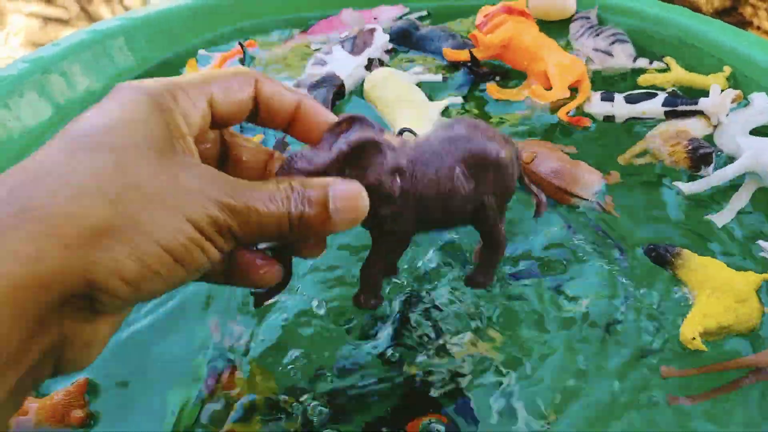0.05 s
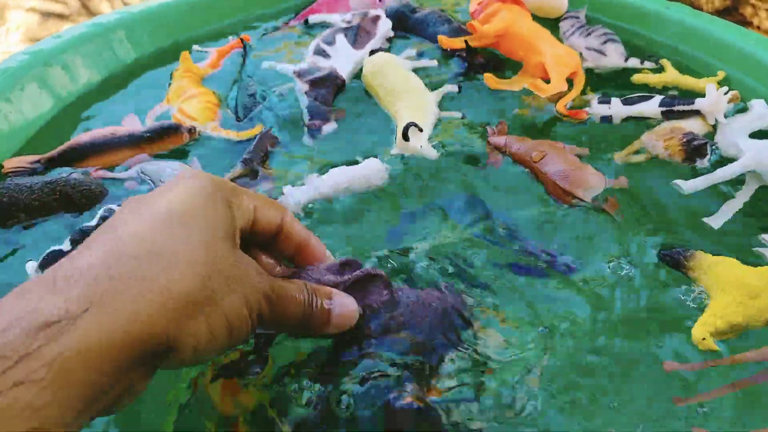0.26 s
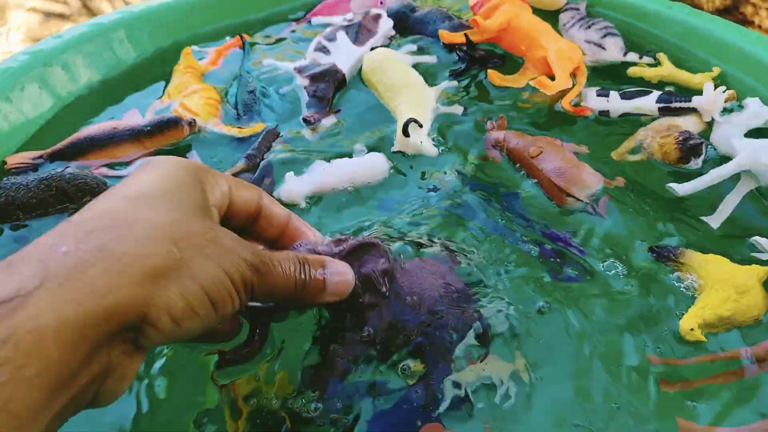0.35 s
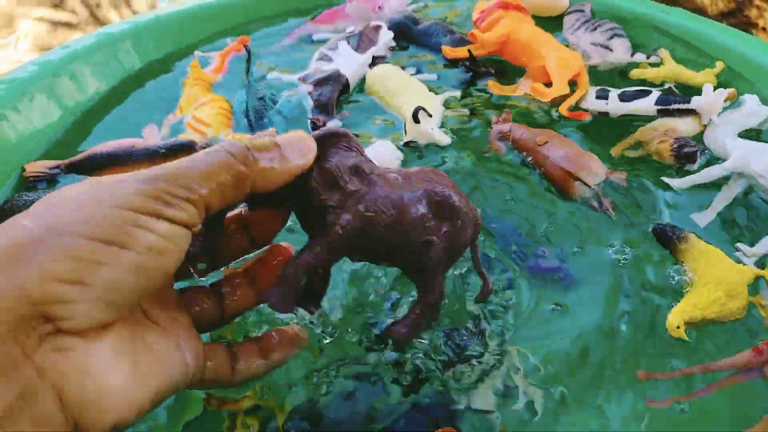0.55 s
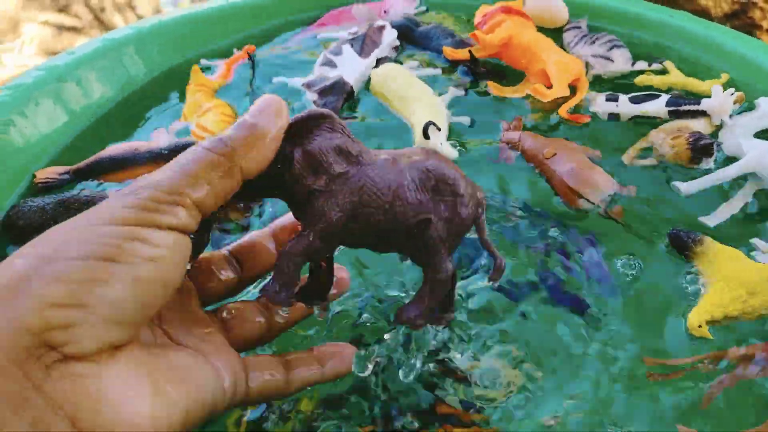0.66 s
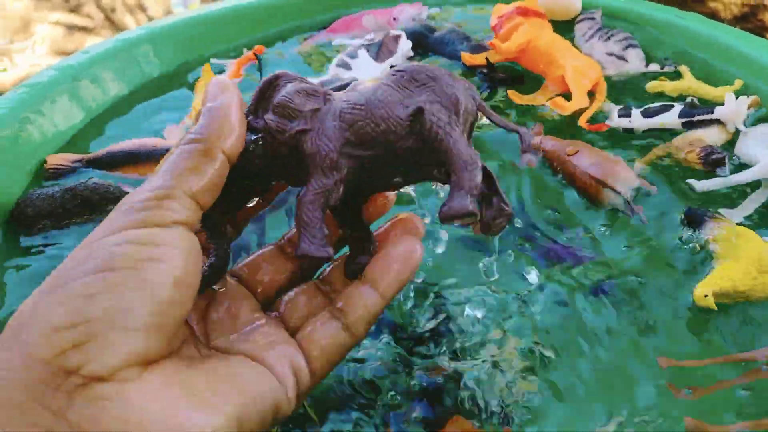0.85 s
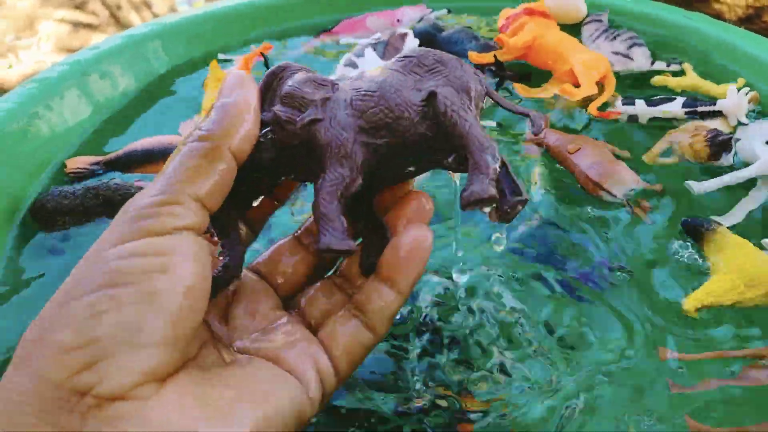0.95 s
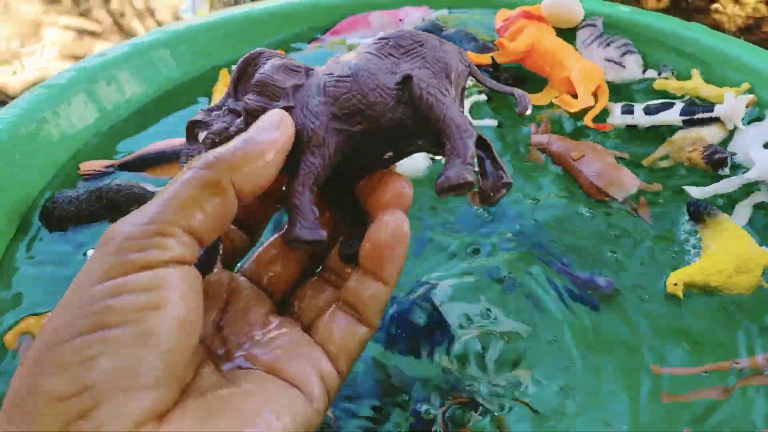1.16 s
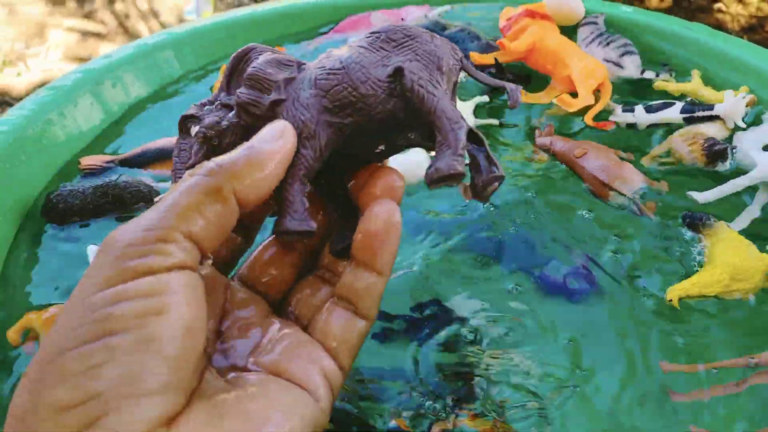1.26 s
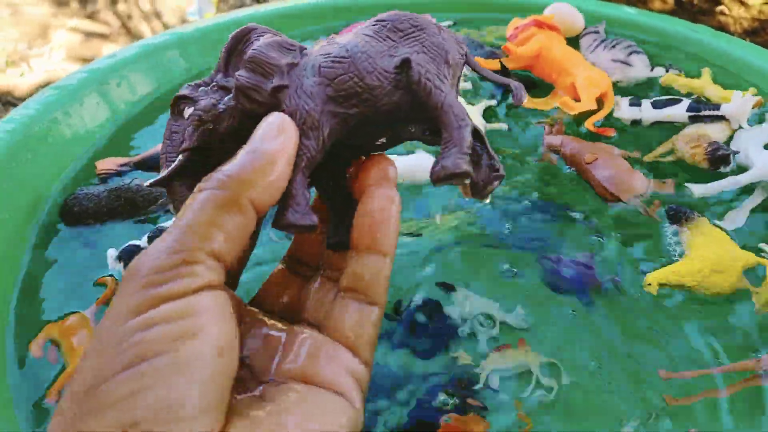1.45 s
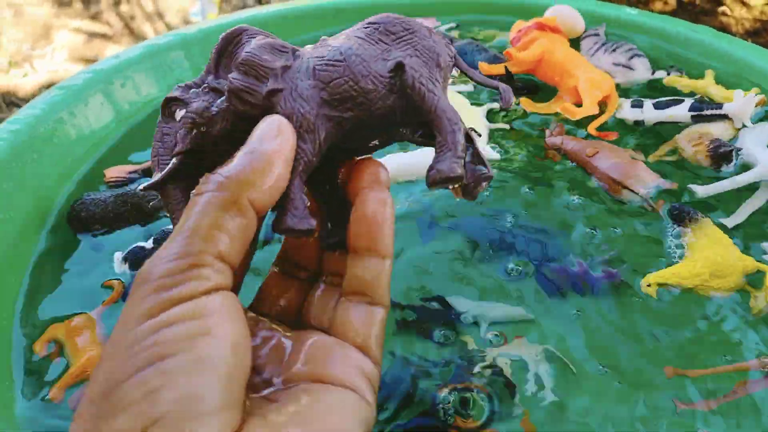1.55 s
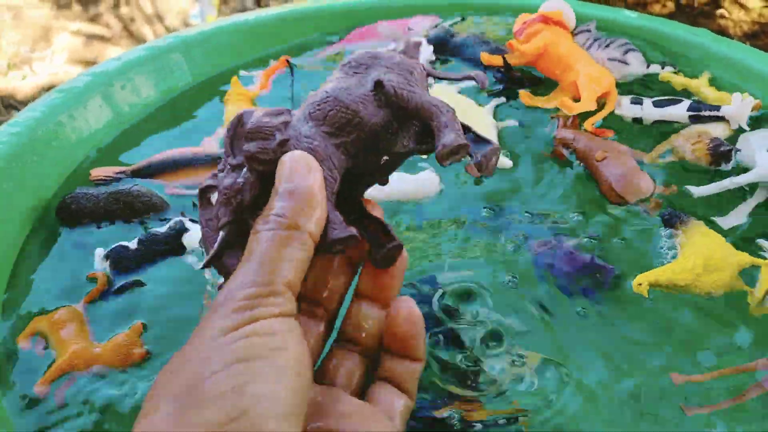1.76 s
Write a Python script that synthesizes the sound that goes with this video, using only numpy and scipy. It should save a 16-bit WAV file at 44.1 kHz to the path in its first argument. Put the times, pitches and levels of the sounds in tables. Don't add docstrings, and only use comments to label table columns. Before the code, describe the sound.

A water splash as a hand plunges a small plastic toy into a tub, then scattered drips

```python
import sys
import numpy as np
from scipy import signal
from scipy.fft import rfft, irfft, next_fast_len
from scipy.io import wavfile
from scipy.ndimage import map_coordinates

SR = 44100
rng = np.random.default_rng(int(sys.argv[2]) if len(sys.argv) > 2 else 0)


def invert_db(x):
    u = np.asarray(x, float) / 20
    return 10 ** u


def wrap_up_sound(samples):
    columns = np.atleast_2d(samples).T
    tamed = np.clip(columns, -1, 1)
    steps = np.round(tamed * 32767).astype(np.int16)
    wavfile.write(sys.argv[1], SR, steps)


N = 79380


def unit(x):
    return x / np.sqrt(np.mean(x ** 2) + 1e-20)


def colour(x, points):
    m = 2 * next_fast_len(N // 2 + 4096)
    freq_hz, gain_db = np.transpose(points)
    log_hz = np.log(np.fft.rfftfreq(m, 1 / SR) + 1)
    cepstrum = irfft(np.log(invert_db(np.interp(log_hz, np.log(freq_hz), gain_db))), m)
    cepstrum[1:m // 2] *= 2
    cepstrum[m // 2 + 1:] = 0
    return irfft(rfft(x, m) * np.exp(rfft(cepstrum)), m)[:N]


def place(start_s, shapes):
    i = np.round(np.asarray(start_s) * SR).astype(int)[:, None] + np.arange(shapes.shape[1])
    return np.bincount(i.ravel(), shapes.ravel(), N + SR)[:N]


def bubbles(start_s, level_db, pitch_hz, life_s, rise, attack_s, size,
            bend=1, fade_db=60, rough=0, swing_db=0):
    t = np.arange(size) / SR
    columns = (level_db, pitch_hz, life_s, rise)
    db, hz, life, rise = [np.broadcast_to(v, np.shape(start_s))[:, None] for v in columns]
    age = t / np.abs(life)
    phase = 2 * np.pi * hz * t * (1 + rise * np.minimum(age, 1.2) ** bend / (bend + 1))
    env = invert_db(db - fade_db * age + swing_db * np.exp(-t * hz / 2))
    env = env * (1 - np.exp(-(t / attack_s) ** 2))
    env = env * np.clip(10 * (1.1 - age), 0, 1)
    noise = rng.standard_normal((len(start_s), 2, size))
    waver = unit(signal.fftconvolve(noise, np.blackman(60)[None, None], 'same', axes=2))
    a, b = waver.transpose(1, 0, 2)
    return place(start_s, env * ((1 + rough * a) * np.sin(phase) + rough * b * np.cos(phase)))


def cracks(start_s, level_db, t60_s, points):
    t = np.arange(600) / SR
    decay = invert_db(np.asarray(level_db)[:, None] - 60 * t / t60_s)
    return colour(place(start_s, rng.standard_normal((len(start_s), len(t))) * decay), points)


def scatter(count, scatter_db, cap_db):
    r = rng.random((count, 2))
    return r[:, 0] * N / SR, np.minimum(-scatter_db * np.log(r[:, 1]), cap_db)


# freq_hz [Hz], density_db [dB per Hz]
YARD = [(30, -17.5), (70, -17.5), (110, -2), (480, -9.5), (800, -10), (2500, -19), (4600, -27), (9000, -47)]
# freq_hz [Hz], gain_db [dB]
FILM = [(3500, -42.5), (4900, -24.5), (5900, -7), (7300, 3), (8300, -6), (9500, -46), (12000, -32)]
# freq_hz [Hz], gain_db [dB]
SPIT = [(7000, -46.5), (9000, -7.5), (10500, -16), (12000, 0.5), (14000, -7), (15300, -1), (16300, -9)]


def yard():
    rumble, far_fizz, hiss = [unit(colour(rng.standard_normal(N), c)) for c in (YARD, FILM, SPIT)]
    t = np.arange(N) / SR
    sway = map_coordinates(rng.standard_normal(40), [np.arange(N) * 15 / SR])
    hum_hz = 98
    hum = invert_db(2.5 * sway) * np.sin(2 * np.pi * hum_hz * t + 0.21 * sway[::-1])
    return invert_db(-77.5) * rumble + invert_db(-83.5) * hum + invert_db(-98) * far_fizz + invert_db(-102) * hiss


# time_s [s], level_db [dB]
STIR = [(0, -55), (.15, -60), (.167, -69), (0.176, -50.5), (0.226, -54), (0.238, -38.5), (.28, -49.5),
        (0.311, -70.5), (0.352, -54.5), (.4, -74.5), (.75, -70.5), (0.928, -70.5), (1.0, -84), (1.15, -71),
        (1.3, -94), (1.55, -81), (1.62, -108), (1.8, -92)]
TUB_HZ = (1420, 2380)
# freq_hz [Hz], gain_db [dB]
CRACK = [(400, -36), (1500, -14), (2500, 0.5), (4600, -12), (5500, -3), (7300, -4.5), (8300, -16.5),
         (9800, -39)]
LIFTED_S = 0.52


def gurgle():
    s, db = scatter(count=600, scatter_db=-2.0, cap_db=2.0)
    g = rng.standard_normal((len(s), 3))
    hz = np.where((g[:, 0] > 0) & (s < LIFTED_S), *TUB_HZ)
    hz = hz * np.exp(0.2 * np.clip(g[:, 1], -1.5, 2))
    life_s = 30 * np.exp(0.45 * np.tanh(g[:, 2])) / hz
    return unit(bubbles(s, db, hz, life_s, 0, 0.00063, size=2400, fade_db=43, rough=0.13))


def stirring():
    t = np.arange(N) / SR
    level_db = np.interp(t, *np.transpose(STIR))
    crackle = unit(cracks(*scatter(count=260, scatter_db=7, cap_db=8), 0.004, FILM))
    wash = unit(cracks(*scatter(count=900, scatter_db=7.0, cap_db=12.5), 0.0068, CRACK))
    spray = unit(cracks(*scatter(count=300, scatter_db=3.0, cap_db=18.5), 0.006, SPIT))
    settle_db_per_s = 1
    crackle_db = -7 - 0.56 * (level_db + 67.5) - settle_db_per_s * t
    gurgle_db = -53 + 1.046 * (level_db + 51.0)
    top = invert_db(crackle_db) * crackle + invert_db(-7) * wash + invert_db(-18) * spray
    return invert_db(level_db) * top + invert_db(gurgle_db) * gurgle()


LATE_S = 0.00044

# start_s [s], level_db [dB peak], pitch_hz [Hz]
GULPS = [(0.004, -39, 2125), (0.023, -70, 1520), (0.059, -37.5, 1555), (0.0255, -43.5, 2170),
         (0.168, -37.5, 2260), (0.189, -31.5, 2870), (0.211, -37.5, 1602), (0.2375, -18, 1600),
         (0.243, -14, 2512), (0.2505, -27.5, 2500), (0.2595, -26.5, 1620), (0.263, -30.5, 900),
         (0.271, -24, 1618), (0.286, -32.5, 1730), (0.294, -35.5, 1420), (0.308, -33.5, 1440),
         (0.347, -41.5, 1690),
         (0.531, -52.5, 2130), (0.579, -44, 2350), (0.632, -54.5, 2250), (0.684, -46.5, 2310),
         (0.704, -47.5, 1485), (0.761, -51, 2240), (0.991, -49, 2360), (1.1125, -34, 2610),
         (1.152, -47.5, 2380), (1.23, -50.5, 2370), (1.253, -55.5, 1670), (1.277, -54.5, 1421),
         (1.326, -55.5, 2836), (.533, -51, 2920), (.826, -60, 2340), (.836, -51.5, 2370),
         (1.153, -56, 1530), (1.253, -56.5, 2710),
         (0.0582, -37.5, 3270),
    (0.2225, -35.5, 2170),
    (.2995, -45, 1420),
    (0.578, -49.5, 1560),
    (0.8551, -44, 1448),
    (0.99, -53, 1480),
    (1.063, -43.5, 2360),
]


def gulps():
    s, db, hz = np.transpose(GULPS)
    s = s + LATE_S
    ring = bubbles(s, db + 1.0, hz, 30 / hz, 0.2, attack_s=0.00055, size=2000, rough=0.4)
    return ring + cracks(s, db - 8.5, 0.019, CRACK)


# start_s [s], level_db [dB peak]
CONTACTS = [(.0055, -62), (.0145, -41), (.0255, -43), (.0435, -65), (.0592, -31), (.1236, -56),
            (.1692, -54.5), (.1845, -36.5), (.2313, -14), (.2372, -25), (.2445, -30), (.2507, -21),
            (.2600, -29), (.2709, -14), (.2880, -36), (.2955, -32.5), (0.8782, -45.5), (.8916, -24),
            (1.0640, -41), (1.0726, -40.5), (1.1106, -28.5), (1.2305, -74), (1.2535, -72), (1.2775, -58),
            (1.3265, -57.5)]
# freq_hz [Hz], gain_db [dB]
CONTACT = [(500, -30), (1400, -2.5), (2500, 11.5), (4600, -9.5), (5800, 1.5), (7300, 0), (8500, -13.5),
           (10000, -33.5)]


def contacts():
    return cracks(*np.transpose(CONTACTS), 0.003, CONTACT)


# start_s [s], level_db [dB peak], pitch_hz [Hz], life_s [s], rise [pitch ratio]
MURK = [(.010, -51, 1409, 0.033, -0.0099), (0.014, -46, 2800, 0.0095, 0.0067),
        (0.061, -74, 1180, 0.043, -0.15), (0.084, -57, 964, 0.047, 0.0086),
        (0.094, -41, 2820, 0.0093, 0.0098), (.183, -37.5, 1457, 0.011, -0.071),
        (.2945, -52, 753, 0.046, 0.053), (0.341, -58.5, 944, 0.08, 0.22),
        (0.377, -46.5, 1060, 0.013, 0.076), (.240, -33.5, 389, 0.027, -0.043),
        (1.211, -58, 2300, 0.01, 0.4)]


def murk():
    return bubbles(*np.transpose(MURK), attack_s=0.006, size=2800, fade_db=12.5, rough=0.17)


# start_s [s], level_db [dB peak], pitch_hz [Hz]
TINY_TICKS = [(0.0169, -37.5, 7330), (0.0693, -27.5, 6350), (0.1695, -39, 6800), (0.184, -35, 6380),
              (0.188, -39.5, 3900), (0.1965, -37, 7600), (0.2306, -23, 7420), (0.2374, -20, 3990),
              (0.2385, -24, 5400), (0.276, -31, 6230), (0.2866, -31, 5900), (0.2947, -38.5, 7600),
              (0.3641, -47, 7160), (0.373, -51.5, 7060), (0.3817, -51, 5030), (0.4645, -48.5, 7000),
              (0.5794, -41, 5900), (0.6334, -42, 6980), (0.6537, -38, 7440), (0.6922, -50, 5340),
         (0.7165, -51, 5000), (0.7335, -49.5, 5150), (0.747, -42, 6230), (0.7599, -44.5, 3570),
         (0.856, -50, 4290), (0.8726, -46.5, 6100), (0.8896, -49, 5100), (0.9573, -55, 5660),
         (1.0303, -44.5, 8390), (1.109, -35, 7030), (1.1312, -43.5, 3770), (1.1505, -44, 7380),
         (1.21, -44.5, 7600),
              (1.267, -53.5, 6820), (1.329, -60.5, 5160), (1.4032, -45.5, 4416), (1.445, -52.5, 3710),
              (1.501, -51.5, 6400), (1.54, -41, 7410), (1.5692, -56, 6970), (1.6651, -35, 6110),
              (1.673, -47.5, 6530), (1.6896, -37, 5750), (1.6931, -37.5, 7710), (1.7864, -54, 6830),
              (.0940, -44, 6950),
    (1.419, -49.5, 5590),
    (1.4435, -47, 6030),
]


def ticks():
    s, db, hz = np.transpose(TINY_TICKS)
    life_s = 0.0097 * 6500 / hz
    return bubbles(s + LATE_S, db + 3.0, hz, life_s, -0.018, attack_s=0.00053, size=900, rough=0.21)


def plunk(rows, bend):
    s, db, hz, life_s, rise = np.transpose(rows)
    ring = bubbles(s, db, hz, life_s, rise, attack_s=0.0018, size=2800, bend=bend,
                   fade_db=24.5, swing_db=17, rough=0.04)
    return ring + cracks(s, db - 4, 0.006, CRACK)


# start_s [s], level_db [dB peak], pitch_hz [Hz], life_s [s], rise [pitch ratio]
POCKETS = [
    (.1230, -50, 1388, 0.043, 0.084),
    (.2308, -15.5, 2415, 0.012, 0.033),
    (.2430, -29, 734, 0.02, 0.076),
    (.2510, -30.5, 910, 0.034, 0.022),
    (.4450, -56, 2390, 0.018, -0.081),
    (.8787, -24.5, 2580, 0.0068, -0.19),
    (1.0727, -30.5, 1420, 0.036, 0.33),
]


def pockets():
    return plunk(POCKETS, bend=1.1)


# start_s [s], level_db [dB peak]
FILMS = [(.2214, -33.5), (.3062, -37.5), (.3349, -44.5), (0.4004, -61), (.4452, -74), (0.4805, -47),
         (.4981, -52), (.5126, -56), (0.534, -60), (0.593, -69), (0.6107, -52), (.6737, -49), (.7110, -40),
         (0.7835, -42), (0.8273, -54), (.9725, -55), (0.994, -42.5), (1.0508, -55.5), (1.0916, -54),
         (1.101, -54), (1.135, -39), (1.175, -64), (1.3043, -61.5), (1.3669, -66.5), (1.3823, -59),
         (1.4031, -44.5), (1.435, -41), (1.4701, -55), (1.488, -69), (1.73, -50), (1.747, -65),
         (1.765, -66)]


def films():
    return cracks(*np.transpose(FILMS), 0.006, FILM)


# start_s [s], level_db [dB peak]
SPITS = [(0.2301, -40), (0.2954, -42.5), (0.633, -54), (0.8779, -57), (1.0301, -61), (1.2064, -52.5),
         (1.297, -69), (1.4032, -55.5), (1.4456, -61.5), (1.6933, -52.5)]


def spits():
    s, db = np.transpose(SPITS)
    return cracks(s + LATE_S, db + 7.0, 0.008, SPIT)


# start_s [s], level_db [dB peak], pitch_hz [Hz]
SLAP = [
    (0.2684, -30.5, 6770),
    (.2704, -9.5, 7250),
    (.2706, -14, 4967),
    (.2712, -18.5, 3950),
    (.2718, -16, 6500),
    (.2720, -16.5, 7300),
    (.2722, -15, 5700),
]


def slap():
    s, db, hz = np.transpose(SLAP)
    return bubbles(s, db + 7.5, hz, 0.0056, 0, attack_s=0.00061, size=500)


# start_s [s], level_db [dB peak], pitch_hz [Hz], life_s [s], rise [pitch ratio]
DRIPS = [
    (.8912, -29, 2220, 0.02, 0.18),
    (1.1105, -26.5, 2425, 0.015, 0.36),
    (1.1318, -42, 2380, 0.016, 0.37),
]


def drips():
    return plunk(DRIPS, bend=3.5)


# start_s [s], level_db [dB peak], pitch_hz [Hz], length_s [s], rise [pitch ratio]
FAR_CALLS = [(1.368, -79, 2330, .045, -0.00025), (1.41, -71, 2620, 0.022, -0.045),
             (1.429, -87.5, 830, 0.1, -0.16), (1.52, -76, 1920, .07, -.07), (1.53, -82, 800, .12, -.02),
             (1.607, -78.5, 1620, 0.096, -.08), (1.69, -82, 826, .11, 0.061), (1.72, -82, 2270, .06, .02),]


def birds():
    return bubbles(*np.transpose(FAR_CALLS), attack_s=0.0072, size=6000, fade_db=3.5, rough=0.063)


def tub(x):
    t = np.arange(3000) / SR
    t60_s, gap_s = 0.03, 0.001
    tail = rng.standard_normal(len(t)) * invert_db(-60 * t / t60_s) * (t > gap_s)
    return signal.fftconvolve(x, tail / np.linalg.norm(tail))[:N]


def scene():
    water = stirring() + gulps() + contacts() + murk() + ticks() + pockets()
    water = water + films() + spits() + slap() + drips()
    water = colour(water, [(200, -28.5), (650, 0.5)])
    return (water + invert_db(-14.5) * tub(water) + yard() + birds())[None]


def low_pass(x):
    return signal.sosfilt(signal.butter(12, 17000, fs=SR, output="sos"), x)


def record(dry):
    top_hz = 16600
    m = next_fast_len(N + 4096)
    mix = irfft(rfft(dry, m) * (np.fft.rfftfreq(m, 1 / SR) < top_hz), m)[:, :N]
    return low_pass(mix)


dry = scene()
out = record(dry)
wrap_up_sound(out)
```